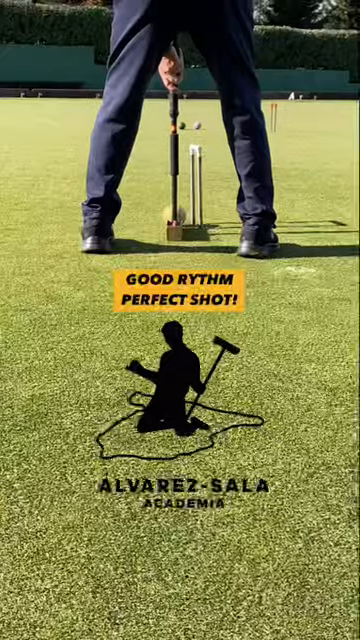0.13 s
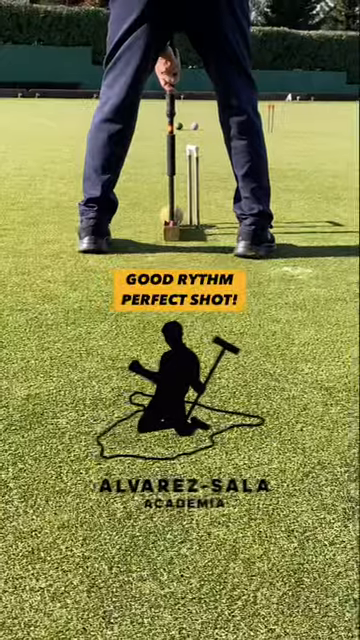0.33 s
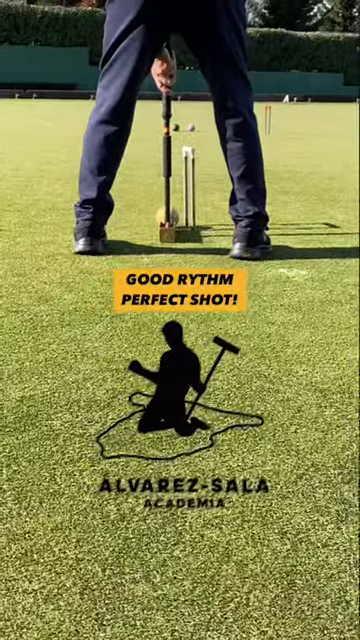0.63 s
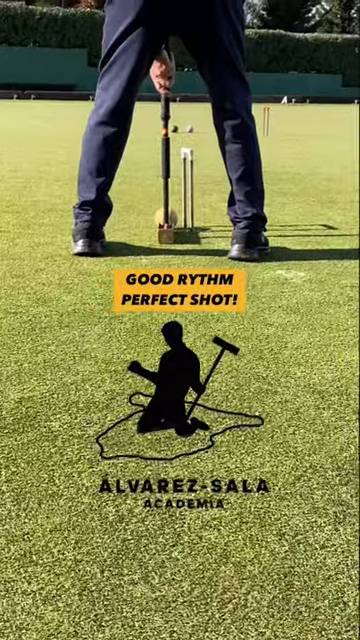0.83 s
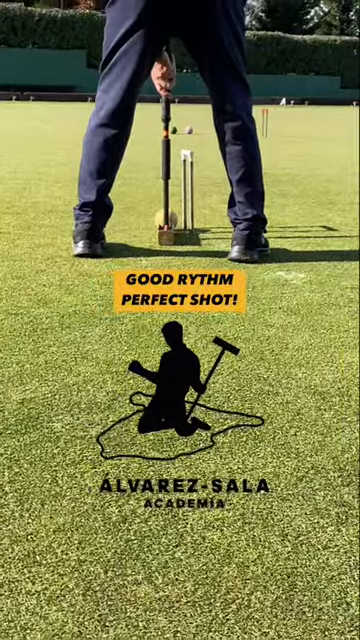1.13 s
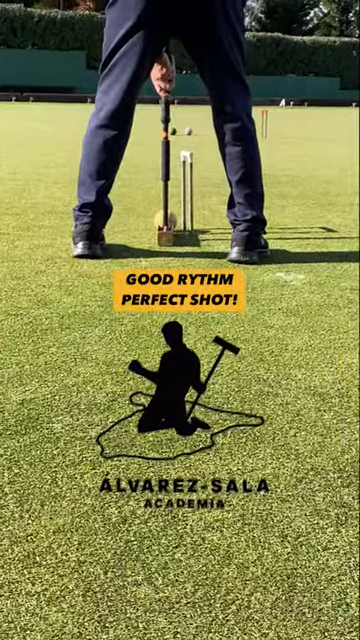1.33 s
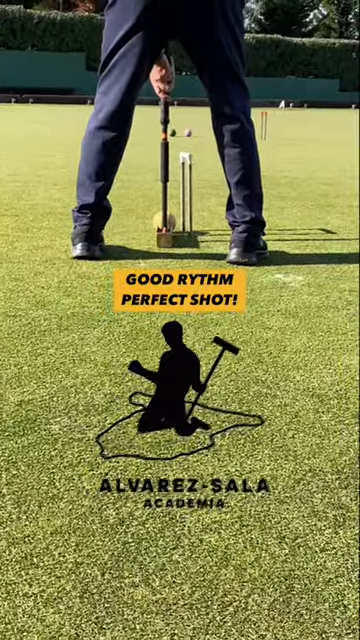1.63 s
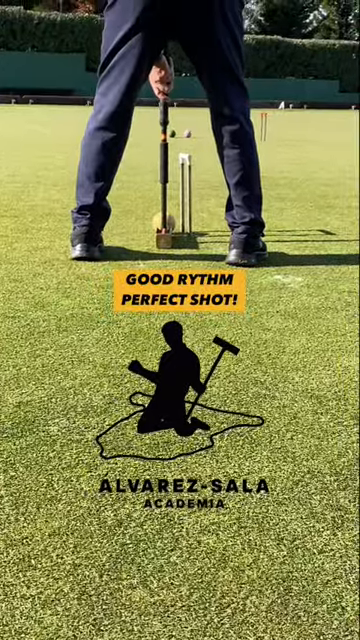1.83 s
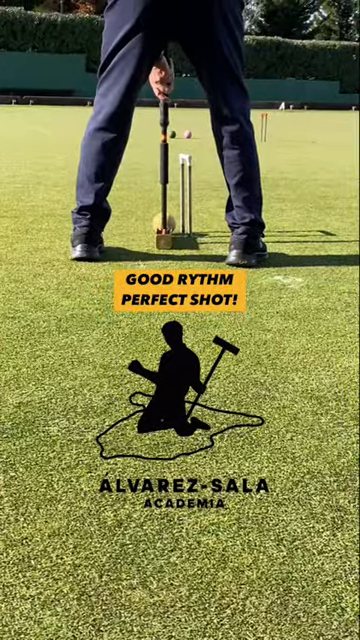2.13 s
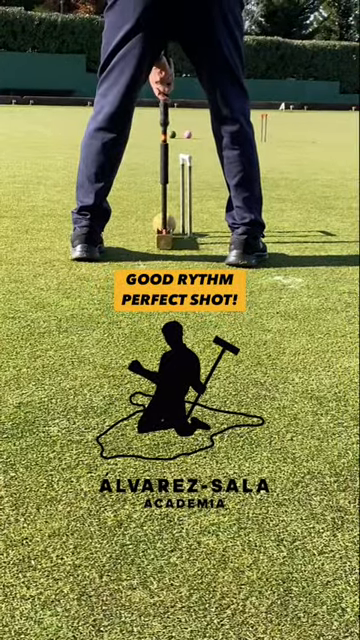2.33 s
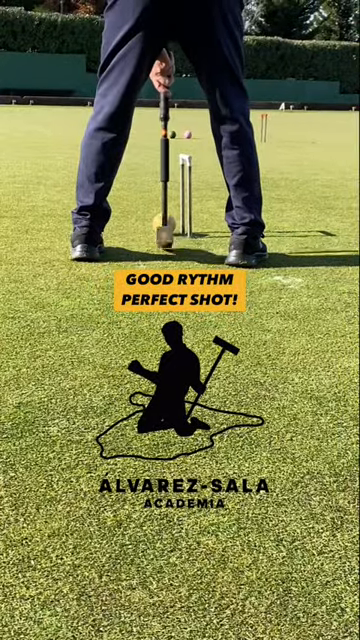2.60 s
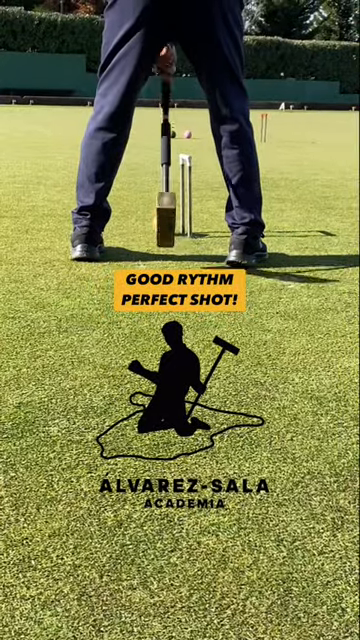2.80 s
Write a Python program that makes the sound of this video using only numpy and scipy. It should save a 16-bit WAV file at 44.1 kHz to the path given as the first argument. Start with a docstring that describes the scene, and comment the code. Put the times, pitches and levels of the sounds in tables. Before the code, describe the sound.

A dull roar of faraway traffic and a low engine drone carry across an open lawn. Early on, light wind and a short handling bump touch the microphone, followed by faint, intermittent cloth rustles.

```python
"""A quiet lawn, heard through a stereo pair of microphones, while a player lines up a shot; no blow falls.
From the start a far engine slowly gains speed over the roar of distant traffic, its lowest tone beating
against a second hum, and wind rumbles on the microphones. At 0.3 s fingers rub and bump their case.
The wind dies away while cloth rustles faintly close by, on and off until 1.7 s and once more near 2.5 s.
A little wind returns at the very end."""
import sys
import numpy as np
from scipy import signal
from scipy.io import wavfile
from scipy.ndimage import uniform_filter1d

SR = 44100
rng = np.random.default_rng(int(sys.argv[2]) if len(sys.argv) > 2 else 0)


def dump(signal):
    """Clip the signal to [-1, 1] and save it as 16-bit WAV at the path in sys.argv[1]."""
    limited = np.clip(np.atleast_2d(signal).T, -1, 1)
    pcm = np.round(limited * 32767).astype(np.int16)
    wavfile.write(sys.argv[1], SR, pcm)


N = 130536
TIME = np.arange(N) / SR
OPPOSITE = np.array([[1], [-1]])  # left and right microphone in opposite polarity

# The far engine, as loud as it reaches the lawn: (time [s], level of harmonics 1, 2, 3, 4 [dB])
ENGINE_HARMONICS = [(0, -44.5, -47, -50, -56.5), (.75, -48, -57, -50, -56), (.98, -43, -40.5, -42.5, -64),
                    (1.5, -41, -43, -42, -53.5), (1.8, -44.5, -37, -42.5, -58.5),
                    (2.25, -48.5, -40, -46.5, -59.5), (2.55, -52, -38, -55, -62),
                    (2.66, -47.5, -42.5, -54.5, -54), (2.76, -42, -38, -47, -60),
                    (2.96, -41, -43, -54, -60)]
# A second hum just above the engine's lowest tone: (time [s], pitch [Hz], level [dB])
SECOND_HUM = [(0, 54.9, -56), (.8, 53.4, -56), (1.2, 51.65, -40.5), (1.45, 52.64, -45), (1.8, 51.13, -41),
              (2.1, 50.36, -49.5), (2.5, 52.72, -46.5), (2.96, 52.84, -39.5)]


def far_engine(firing_hz=46.696, rise_hz_per_s=1.2832, rise_hz_per_s2=.2113, in_step_s=2.8):
    """Clean multiples of a rising firing rate; the lowest beats against a hum close above it."""
    def phase_of(hz):
        turns = np.cumsum(hz) / SR
        return 2 * np.pi * (turns - turns[round(in_step_s * SR)])
    firing = phase_of(firing_hz + rise_hz_per_s * TIME + rise_hz_per_s2 * TIME ** 2)
    engine = sum(gain_of(db + 0.2 * drift(TIME, 1, 1.4)) * np.cos(k * firing)
                 for k, db in enumerate(curves(ENGINE_HARMONICS, TIME), start=1))
    hum_hz, hum_db = curves(SECOND_HUM, TIME)
    hum = gain_of(hum_db) * np.cos(phase_of(hum_hz))
    return np.sqrt(2) * (engine + hum)


# Colour of the traffic from far off: (frequency [Hz], relative level [dB])
ROAR_SPECTRUM = [(18, -34), (34, -13), (52, -10), (66, -0.5), (80, -0.5), (114, -2.5), (162, -11.5),
                 (191, -9), (295, -13.5), (618, -26), (1080, -29.5), (1300, -38.5), (1560, -41.5),
                 (2500, -44.5), (3000, -43), (3410, -51), (4250, -56), (4600, -64), (5340, -77.5),
                 (9040, -120)]
# Bands in which the roar swells: (centre [Hz])
SWELL_BANDS = [100, 290, 800, 2200, 4200]
# Rise and fall of the roar: (time [s], level change in each of the five bands [dB])
ROAR_SWELLS = [(0, 3.1, 1, 2.5, 7, -2.7), (.15, 0, 2, 2, 4.5, -2.2), (.23, 0, 2, 0, 7.5, -3.1),
               (.3, -1.5, 2, -0.5, 6.5, 0), (.33, -3, 1.3, -0.5, 6, -0.5), (.42, 1, 2.2, -5, 7, 2.2),
               (.46, 2.3, 0.5, 3, 5, 1.5), (.9, -4, -1, 0, 2.5, 2.5), (1.2, -2, -0.5, 0, 2, 2),
               (1.5, -2.5, 0.2, 0, 3.5, 5.5), (1.9, -0.5, -0.33, 0, -1, 1), (2.2, 0.7, 1.5, 1.5, 0, 2.5),
               (2.55, 4, -0.2, 1.5, -2.5, 0), (2.96, -0.5, 2, 3, -1, -0.3)]
# Width of the traffic across the pair: (frequency [Hz], side over mid [dB])
ROAR_WIDTH = [(50, -46), (110, -45), (190, -25.5), (350, -13), (630, -11), (1100, -13), (1300, -11.5),
              (1600, -15), (1900, -16), (2050, -19), (2500, -16), (2900, -21), (3300, -39.5), (4100, -30),
              (4250, -6.5), (4600, -5.5), (4900, -27.5)]
# The traffic sits slightly to the right: (frequency [Hz], left over right [dB])
ROAR_BALANCE = [(150, 0), (310, -1.7), (600, -2.2), (1100, -1), (2000, 0)]
# Phase shift from the spacing of the microphones: (frequency [Hz], left lead [rad])
SPACING_PHASE = [(300, -0.16), (1030, -0.39), (1640, -0.21), (1980, 0)]


def distant_traffic(level_db=-38.5):
    """Dull roar with drifting patches and a flutter shared by all bands above the bass."""
    def colour(t, hz):
        patches = patchy(t, hz, bins=10, frames=6)
        swell = np.array([np.interp(np.log(hz + 1), np.log(SWELL_BANDS), band_db)
                          for band_db in curves(ROAR_SWELLS, t).T]).T
        flutter = 0.68 * drift(t, 2.022, 25) * np.clip(hz / 600, 0, 1)[:, None]
        return at_hz(ROAR_SPECTRUM, hz) + swell + patches + flutter
    return gain_of(level_db) * stereo_noise(2048, colour, ROAR_WIDTH, ROAR_BALANCE, SPACING_PHASE)


# Swells of rumble, centred between the microphones: (middle [s], pitch [Hz], level [dB], length [s])
RUMBLE_SWELLS = [(0.071, 271.2, -48.5, 0.19), (0.203, 88.5, -38, 0.15), (.2, 263.4, -48, 0.11),
                 (0.296, 305, -45.5, 0.092), (0.566, 133.4, -37, .12), (0.803, 96, -44, 0.1),
                 (1.15, 122.4, -42.5, 0.23), (2.269, 70, -39.5, .08), (2.563, 79, -39.5, 0.1)]


def rumble():
    """Low tones that rise briefly out of the roar."""
    return sum(puff(*swell) for swell in RUMBLE_SWELLS)


# Bumps right on the microphone case: (start [s], peak [dB], length [s], end pitch [Hz])
CASE_BUMPS = [(.334, -36.5, 0.022, 119), (.361, -38.5, 0.012, 450), (0.395, -40.5, 0.0053, 353),
              (0.403, -35, 0.017, 220)]
# Fingers rubbing the case: (time [s], level [dB])
FINGER_RUB = [(.3, -72), (.335, -60.5), (.37, -57), (.39, -62), (.43, -52.5), (.45, -61), (.55, -58),
              (.58, -67)]
# Band of the rub: (low edge [Hz], high edge [Hz])
RUB_BAND = [310, 1610]


def handling(bump_top_hz=1110, bump_fall_s=0.0024, case_top_hz=2200):
    """A short rub and thumps that drop in pitch, dulled by the case they pass through."""
    friction = unit_rms(butterworth(rng.standard_normal(N), 5, RUB_BAND, "band"))
    out = gain_of(curves(FINGER_RUB, TIME)[0]) * friction
    for start, db, length, end_hz in CASE_BUMPS:
        age = np.clip(TIME - start, 0, length)
        turns = end_hz * age + (bump_top_hz - end_hz) * bump_fall_s * (1 - np.exp(-age / bump_fall_s))
        envelope = np.sin(np.pi * (age / length) ** 0.43)
        out = out + gain_of(db) * envelope * np.sin(2 * np.pi * turns)
    return butterworth(out, 4, case_top_hz, "low") * OPPOSITE


# Wind on the microphones: (time [s], level [dB])
WIND_LEVEL = [(0, -46.5), (.33, -51.5), (.5, -66), (.85, -67), (1, -78.5), (2.7, -89), (2.96, -60)]


def wind(top_hz=73, gust_db=3):
    """Air buffets the microphones with a low, lumpy rumble."""
    buffeting = unit_rms(butterworth(rng.standard_normal(N), 3, top_hz, "low"))
    level_db = curves(WIND_LEVEL, TIME)[0] + gust_db * drift(TIME, 2, 10)
    return gain_of(level_db) * buffeting * OPPOSITE


# Cloth stirring near the microphones:
# (start [s], length [s], time spent rising [share], level of the low, middle and top band [dB])
CLOTH_RUSTLES = [(.325, .05, .2, -87.5, -110, -125), (.45, 0.19, 0.41, -87, -104.5, -125),
                 (.535, 0.15, 0.095, -91, -89.5, -125), (0.768, .11, 0.53, -80, -82.5, -90),
                 (.86, 0.08, .6, -87.5, -89.5, -108), (1.052, 0.39, 0.6, -90.5, -94, -125),
                 (1.3, 0.36, 0.55, -85.5, -85.5, -86), (2.449, .1, 0.42, -84, -87.5, -125)]
# Borders of those bands: (low to middle [Hz], middle to top [Hz])
CLOTH_BORDERS = [7500, 13700]
# Steady hiss under the rustles: (low band [dB], middle band [dB], top band [dB])
HISS_FLOOR = [-89, -96, -118]
# Colour of the rustle: (frequency [Hz], relative level [dB])
CLOTH_SPECTRUM = [(3000, -13), (5000, 0.5), (6700, -14), (7100, -31), (8000, -31), (8400, -8.5),
                  (10500, -6.5), (12300, -8.5), (13000, -19.5), (14300, -28.5), (15200, -9), (16000, -13)]
# Colour of a faint, wide high hiss that swells with the rustles: (frequency [Hz], relative level [dB])
WIDE_HISS_SPECTRUM = [(4900, -32), (5600, -1.5), (7000, 0.5), (9400, -6.5), (9800, -30), (11300, -31.5),
                      (12000, -7), (13200, -4.5), (15000, -11)]


def cloth(grit_db=0.5, patch_db=2, wide_hiss_db=4.5):
    """Each rustle swells gritty out of a faint hiss and stops; a wide hiss follows the middle band."""
    levels = gain_of(HISS_FLOOR)[:, None] * np.ones(N)
    for start, length, rise, *band_db in CLOTH_RUSTLES:
        progress = (TIME - start) / length
        ramp = np.clip(np.minimum(progress / rise, (1 - progress) / (1 - rise)), 0, 1)
        levels += gain_of(band_db)[:, None] * ramp ** 0.78
    roughness = unit_rms(uniform_filter1d(rng.standard_normal(N), size=200))
    grit = unit_rms(gain_of(grit_db * roughness))
    rustle = 0
    for band, level in enumerate(levels):
        def colour(t, hz):
            outside = (np.searchsorted(CLOTH_BORDERS, hz) != band)[:, None]
            patches = patch_db * patchy(t, hz, bins=4, frames=14)
            return at_hz(CLOTH_SPECTRUM, hz) - 99 * outside + patches
        rustle = rustle + level * grit * stereo_noise(256, colour, side_db=-20)
    wide_hiss = stereo_noise(256, lambda t, hz: at_hz(WIDE_HISS_SPECTRUM, hz), side_db=-99) * OPPOSITE
    return rustle + gain_of(wide_hiss_db) * levels[1] * wide_hiss


# Small catches in the nearby cloth: (middle [s], pitch [Hz], level of each grain [dB], length [s])
CLOTH_CATCHES = [(.338, 5800, -85.5, .01), (.407, 2300, -65, .016), (.545, 6300, -91, .035),
                 (.545, 10000, -95, .01), (.641, 10000, -88, .003), (.797, 5800, -92, .008),
                 (.823, 10300, -90, .012), (.903, 10800, -95, .016), (1.47, 10300, -95, .012),
                 (1.585, 9300, -92, .014)]


def cloth_ticks(grains=15, pitch_spread=.18):
    """Each catch ticks as a cluster of tiny tones scattered in pitch and time."""
    detunes = 1 + pitch_spread * rng.uniform(-1, 1, (len(CLOTH_CATCHES), grains))
    shifts = rng.uniform(-.5, .5, detunes.shape)
    return sum(puff(middle + length * shift, hz * detune, db, length / 4)
               for i, (middle, hz, db, length) in enumerate(CLOTH_CATCHES)
               for detune, shift in zip(detunes[i], shifts[i]))


def stereo_noise(size, colour, side_db, balance_db=0, lead_rad=0):
    """Stereo noise of rms 1 from short-time spectra shaped by colour(t, hz) in dB."""
    hop = size // 4
    frames, hz = N // hop + 5, np.fft.rfftfreq(size, 1 / SR)
    a, b, c, d = rng.standard_normal((frames, len(hz), 4)).T
    mid = a + 1j * b
    side = (c + 1j * d) * gain_of(at_hz(side_db, hz))
    lean = gain_of(at_hz(balance_db, hz) / 2) * np.exp(.5j * at_hz(lead_rad, hz))
    spectra = np.array([(mid + side) * lean, (mid - side) / lean])
    spectra *= gain_of(colour(np.arange(frames) * hop / SR, hz))
    return unit_rms(signal.istft(spectra, nperseg=size, noverlap=size - hop)[1][:, :N])


def puff(middle, hz, db, length):
    """A tone under a smooth hump."""
    offset = TIME - middle
    hump = np.exp(-8 * (offset / length) ** 2)
    return np.sqrt(2) * gain_of(db) * hump * np.sin(2 * np.pi * (hz * offset + rng.random()))


def drift(t, low_hz, top_hz):
    """Slow random drift of rms 1."""
    rates = np.geomspace(low_hz, top_hz, num=20)
    return unit_rms(sum(np.sin(2 * np.pi * (hz * t + rng.random())) / np.sqrt(hz) for hz in rates))


def patchy(t, hz, bins, frames):
    """Random patches of rms 1 over frequency and time."""
    speckle = rng.standard_normal((len(t), len(hz))).T
    return unit_rms(uniform_filter1d(uniform_filter1d(speckle, bins, axis=0), frames, axis=1))


def at_hz(points, hz):
    """A table read along log frequency, as a column; a plain number holds at all frequencies."""
    if np.isscalar(points):
        return points
    knots_hz, values = np.transpose(points)
    return np.interp(np.log(hz + 1), np.log(knots_hz + 1), values)[:, None]


def curves(table, t):
    """Each value column of a table, interpolated at times t."""
    times, *columns = np.transpose(table)
    return np.array([np.interp(t, times, column) for column in columns])


def butterworth(x, order, hz, kind):
    return signal.sosfilt(signal.butter(order, hz, kind, fs=SR, output="sos"), x)


def gain_of(db):
    return 10 ** (np.asarray(db) / 20)


def unit_rms(x):
    return x / np.sqrt(np.mean(x ** 2) + 1e-20)


def scene():
    """The lawn from far to near: engine and traffic, then cloth, then what touches the microphones."""
    return far_engine() + distant_traffic() + rumble() + cloth() + cloth_ticks() + handling() + wind()


def record(dry):
    """The microphones cut the deepest bass; sound starts after a short silence and is band-limited."""
    low_cut_hz, start_s, top_hz = 34.2, .0358, 15800
    fade_in = np.clip((TIME - start_s) / .001, 0, 1)
    band_limit = signal.firwin(511, top_hz, window=("kaiser", 9), fs=SR)
    return signal.oaconvolve(butterworth(dry, 6, low_cut_hz, "high") * fade_in, band_limit[None], "same")


dry = scene()
out = record(dry)
dump(out)
```